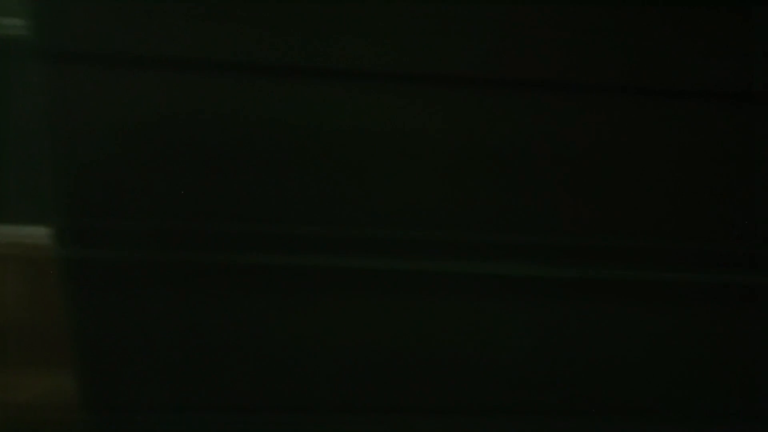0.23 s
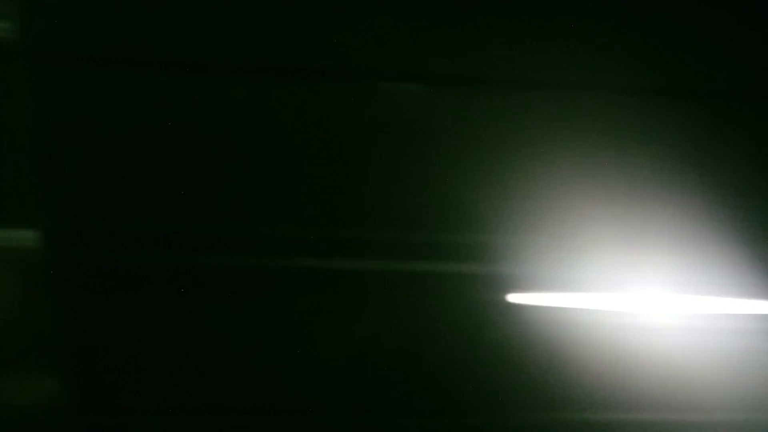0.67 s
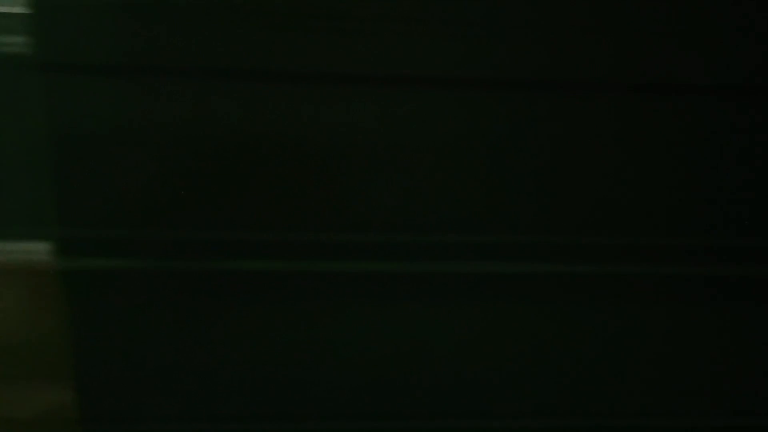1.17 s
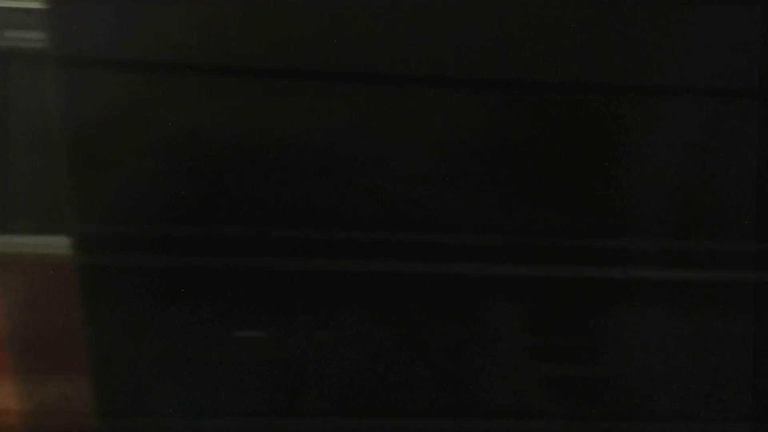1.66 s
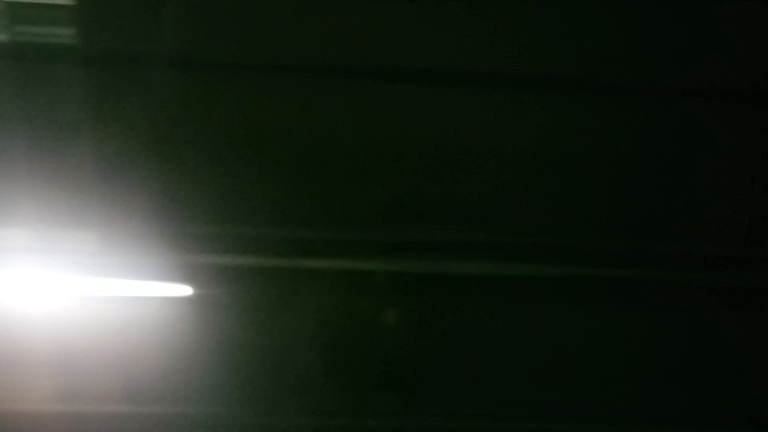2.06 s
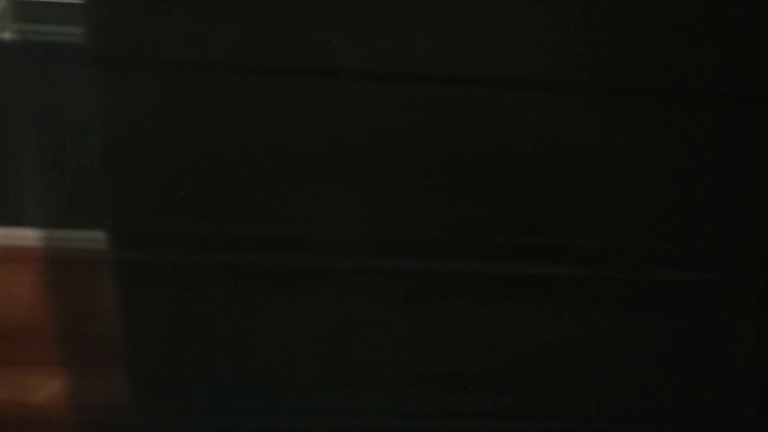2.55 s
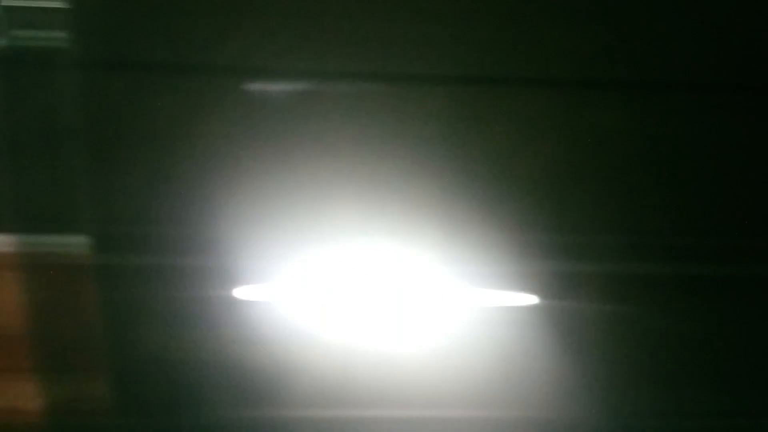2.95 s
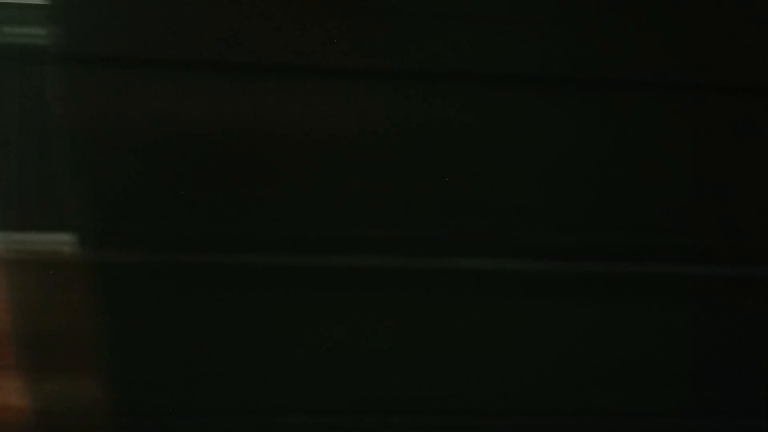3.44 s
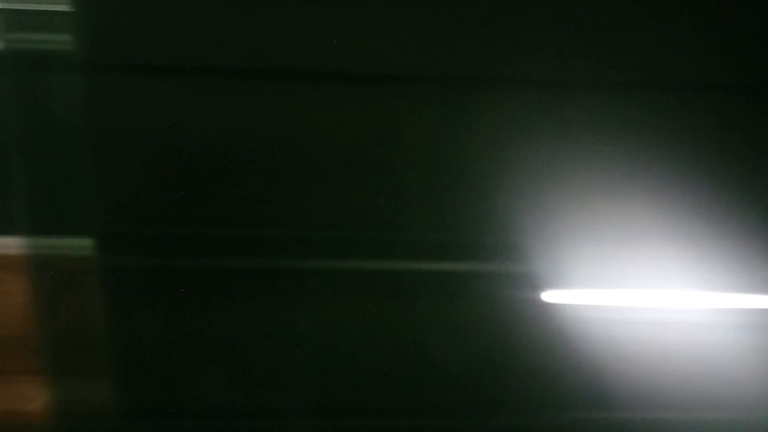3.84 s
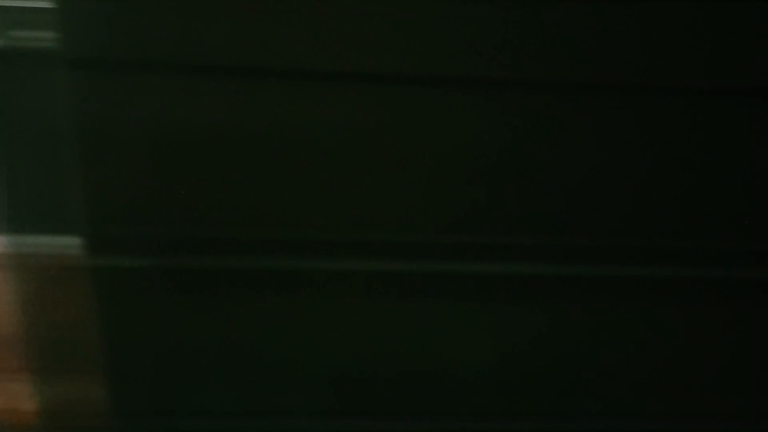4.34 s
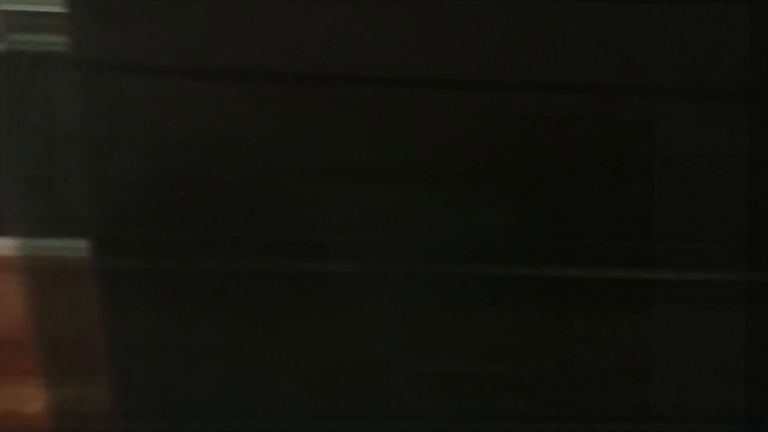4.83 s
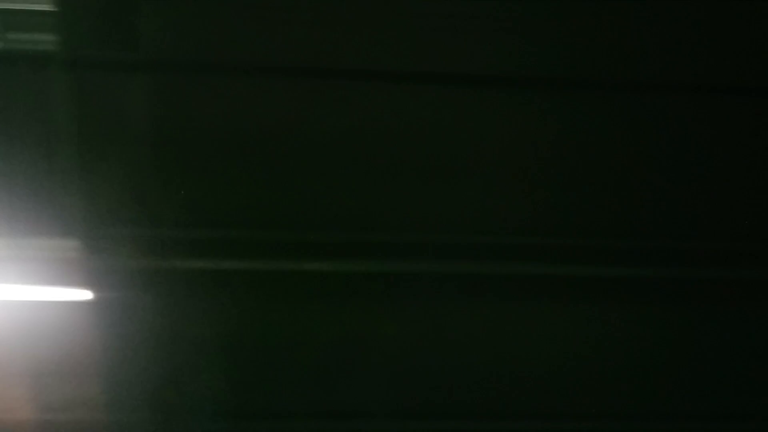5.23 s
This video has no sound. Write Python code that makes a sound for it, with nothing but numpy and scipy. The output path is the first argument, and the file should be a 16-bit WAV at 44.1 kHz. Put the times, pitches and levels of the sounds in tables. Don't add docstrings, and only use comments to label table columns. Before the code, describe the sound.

From inside an electric train running steadily through a dark tunnel, a loud, hollow mid-low drone of wheels on rail fills the car, surging and easing with rough track. Wavering gear hum blends in. Early on, a thin flange whine throbs very faintly; later, weak puffs of compressed air spit. A small close microphone gives thin deep bass and dense, slightly limited loudness, in mono.

```python
import sys
import numpy as np
from scipy import signal
from scipy.fft import rfft, irfft
from scipy.io import wavfile
from scipy.ndimage import uniform_filter1d, minimum_filter1d

SR = 44100
rng = np.random.default_rng(int(sys.argv[2]) if len(sys.argv) > 2 else 0)


def ratio_of_db(decibels):
    return 10 ** (np.asarray(decibels, float) / 20)


def master_out(mix):
    frames = np.transpose(np.atleast_2d(mix))
    ceiling = np.clip(frames, -1, 1)
    pcm = np.round(ceiling * 32767).astype(np.int16)
    wavfile.write(sys.argv[1], SR, pcm)


N = 242550
T = np.arange(N) / SR
F = np.maximum(np.arange(N // 2 + 1) * SR / N, 1)


def slope(points):
    hz, db = np.transpose(points)
    return ratio_of_db(np.interp(np.log(F), np.log(hz), db, left=-150, right=-150))


def rings(modes, steep=1.1):
    power = 0
    for hz, width_hz, db in modes:
        detune = (F - hz ** 2 / F) / width_hz
        power = power + ratio_of_db(db) ** 2 / (1 + detune ** 2) ** steep
    return np.sqrt(power)


def noise(gain, lo_hz, hi_hz):
    spec = rfft(rng.standard_normal(N)) * gain
    band = (F > lo_hz) & (F < hi_hz)
    power = np.sum(np.abs(spec[band]) ** 2) * 2 / N ** 2
    return irfft(spec, N) / np.sqrt(power)


def walk(rate_hz):
    hold = int(SR / rate_hz)
    steps = np.repeat(rng.standard_normal(400), hold)[:N]
    return 1.3 * uniform_filter1d(uniform_filter1d(steps, hold), hold)


def tone(hz, db):
    cycles = np.cumsum(hz + 0 * T) / SR + rng.random()
    return np.sqrt(2) * ratio_of_db(db) * np.sin(2 * np.pi * cycles)


def roughness_db():
    # time in seconds, level over smooth rail in dB.
    rough_track = [(0, -4), (.34, -2.5), (.9, -0.5), (1.3, .5), (2.04, -2.5), (2.11, 3.8), (2.5, 2.5),
                   (2.85, -1), (3.15, -2), (3.45, 1.5), (3.72, -2), (4.2, 2), (4.42, 0), (4.9, 2.5),
                   (5.1, 0.5), (5.4, 2.5), (5.5, 1)]
    s, db = np.transpose(rough_track)
    return np.interp(T, s, db)


def heavy_panels():
    return 1 / (1 + (F / 1800) ** 4)


def floor(rough_db):
    # frequency in Hz, width in Hz, level in dB.
    floor_modes = [(410.3, 34.3, 0.5), (449, 45, -0.5), (501, 46, -8.5)]
    level_db = -15.5 + .95 * rough_db + .18 * walk(4.5)
    return noise(heavy_panels() * rings(floor_modes, steep=2.03), 340, 520) * ratio_of_db(level_db)


def lower_panel(rough_db):
    # frequency in Hz, width in Hz, level in dB.
    panel_modes = [(358.8, 22, -0.5), (386.5, 29, 0)]
    growth_db_s = 0.96
    level_db = -24 + growth_db_s * T + 1.1 * rough_db + 1.5 * walk(5.5)
    return noise(heavy_panels() * rings(panel_modes, steep=1.28), 345, 402) * ratio_of_db(level_db)


def rails(rough_db):
    # frequency in Hz, width in Hz, level in dB.
    rail_modes = [(645, 200, -1), (693, 120, -0.5), (812, 48, -7.5)]
    level_db = -23.5 + .62 * rough_db + .8 * walk(4.5)
    return noise(heavy_panels() * rings(rail_modes, steep=1.83), 600, 800) * ratio_of_db(level_db)


def body(rough_db):
    # frequency in Hz, level in dB per Hz.
    body_colour = [(18, -51.5), (30, -38), (42, -27), (55, -20.5), (76, -15), (102, -11.5), (126, -4.5),
                   (182, -3), (256, 0), (315, -.5), (435, -27), (710, -90.5)]
    level_db = -24.5 + .1 * rough_db + .4 * walk(4.5)
    return noise(slope(body_colour), 90, 318) * ratio_of_db(level_db)


def tunnel_roar(rough_db):
    # frequency in Hz, level in dB per Hz.
    tunnel_colour = [(500, -26.5), (800, -2.5), (900, -2), (1230, -3.5), (1330, -6.5), (1700, -10.5),
                     (2030, -10), (2860, -16), (3090, -19), (4000, -27), (5250, -33.5), (5900, -41.5),
                     (7000, -52), (8500, -71)]
    # frequency in Hz, width in Hz, level over the roar in dB.
    wheel_modes = [(2130, 130, -5), (2565, 110, 0.5), (3575, 120, 3)]
    level_db = -27 + .12 * rough_db + .39 * walk(5)
    colour = slope(tunnel_colour) * np.hypot(1, rings(wheel_modes))
    return noise(colour, 902, 5000) * ratio_of_db(level_db)


def rolling():
    rough_db = roughness_db()
    car = floor(rough_db) + lower_panel(rough_db) + body(rough_db)
    return car + rails(rough_db) + tunnel_roar(rough_db)


def motor_shaft():
    pull_db, pull_at_s, pull_s = 4, 3.1, 1.1
    level_db = -46.5 + pull_db * np.exp(-((T - pull_at_s) / pull_s) ** 2)
    return tone(67 * (1 + .0066 * walk(1.5)), level_db)


def inverter():
    # frequency in Hz, level in dB.
    inverter_tones = [(7900, -96), (8000, -94.5), (8100, -101), (15132, -106), (15585, -103)]
    return sum(tone(hz, db) for hz, db in inverter_tones)


def gears():
    # start in seconds, end in seconds, frequency in Hz, level in dB.
    gear_swells = [(.31, 1.05, 203.2, -30.5), (1.61, 2.52, 201.1, -33), (3.02, 3.72, 201.8, -34),
                   (4.52, 5.8, 203.1, -32), (.2, 1.56, 416, -20), (2.0, 3.22, 411, -19.5),
                   (4.52, 5.62, 441.5, -20.5), (.62, 1.02, 692.5, -28.5), (1.98, 3.48, 680, -30),
                   (.8, 1.5, 944.5, -32), (3.52, 4.92, 945.5, -39), (-.3, 2.05, 1080.5, -41),
                   (4.72, 5.32, 1087, -38.5), (-.3, .72, 2573, -47.5), (3.82, 4.42, 2564, -48.5),
                   (4.72, 5.62, 2580.5, -48.5)]
    out = 0
    for start_s, end_s, hz, db in gear_swells:
        part = np.clip((T - start_s) / (end_s - start_s), 0, 1)
        swell = np.sqrt(np.sin(np.pi * part) + 1e-12)
        waver = 1 + .002 * walk(5)
        out = out + swell * tone(hz * waver, db + 2.2 * walk(9))
    return out


def ventilation():
    # frequency in Hz, level in dB per Hz.
    cabin_colour = [(5100, -21), (7100, -4), (8100, -5), (9200, .5), (10400, -2.5), (11700, -8.5),
                    (14400, -13.5), (15050, -11), (15550, -5), (15900, -8)]
    return noise(slope(cabin_colour), 7500, 16000) * ratio_of_db(-77.5 + 1.3 * walk(25))


def squeal():
    from_s, to_s, fade_s = .72, 2.2, .11
    throb_hz, throb_db = 1.9, 3.5
    touch = np.clip(np.minimum(T - from_s, to_s - T) / fade_s, 0, 1)
    throb = np.cos(2 * np.pi * throb_hz * (T - from_s - fade_s))
    hz = 2824 * (1 + .005 * walk(4.5) + .0026 * walk(15))
    return touch * tone(hz, -48.5 + throb_db * throb + 3.4 * walk(20))


def valves():
    # start in seconds, peak in dB, opening in seconds, t60 in seconds.
    puffs = [
        (.852, -72.5, .002, .9),
        (2.18, -71, .006, 1.1),
        (3.058, -70.5, .003, .25),
        (4.224, -77, .004, .5),
        (4.314, -68, .003, .3),
        (4.39, -77, .02, .8),
        (4.52, -63.5, .11, .45),
        (5.06, -59.5, .002, 1.05),
        (5.455, -72, .006, .5),
    ]
    # frequency in Hz, level in dB per Hz.
    air_colour = [(4100, -22), (5500, -6), (7600, -7), (8300, -5), (9200, .5), (10300, -2), (11800, -13),
                  (13000, -27), (15900, -36)]
    hold_s = .025
    shape = 0
    for start_s, db, rise_s, t60_s in puffs:
        closing_s = np.maximum(T - start_s - 2 * rise_s - hold_s, 0)
        tail = np.exp(-np.log(1000) * closing_s / t60_s)
        shape = shape + ratio_of_db(db) * np.clip((T - start_s) / rise_s, 0, 1) * tail
    return shape * ratio_of_db(1.5 * walk(50)) * noise(slope(air_colour), 8000, 11500)


def scene():
    drive = motor_shaft() + inverter() + gears()
    return (rolling() + drive + ventilation() + squeal() + valves())[None]


def roll_off(x):
    return signal.sosfilt(signal.butter(12, 15760, fs=SR, output="sos"), x)


def record(dry):
    thin = signal.sosfilt(signal.butter(2, 35, "high", fs=SR, output="sos"), dry)
    room_left = np.minimum(.98 / (np.abs(thin) + 1e-9), 1)
    gain = uniform_filter1d(minimum_filter1d(room_left, size=401), size=401)
    return roll_off(thin * gain)


dry = scene()
out = record(dry)
master_out(out)
```